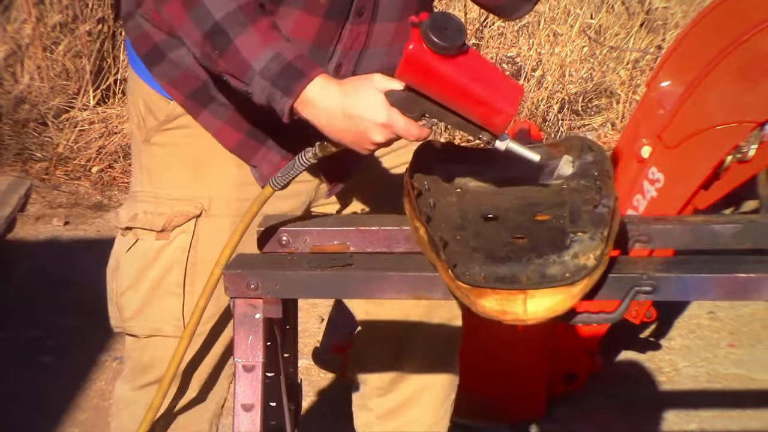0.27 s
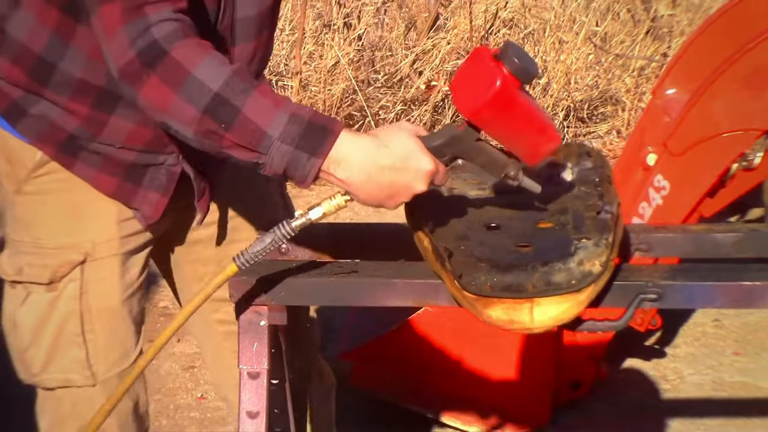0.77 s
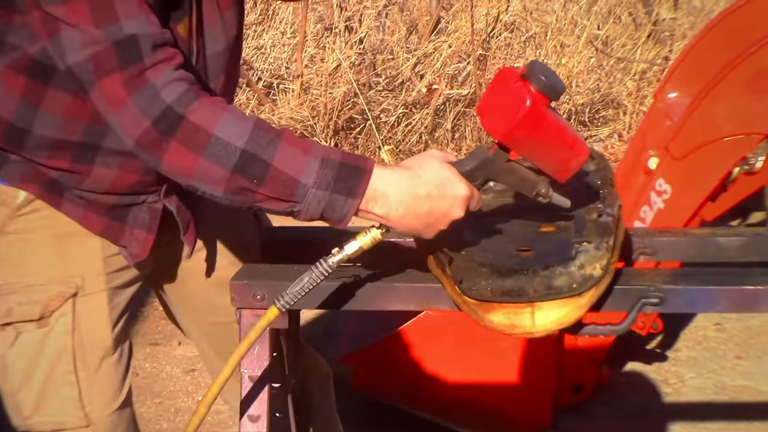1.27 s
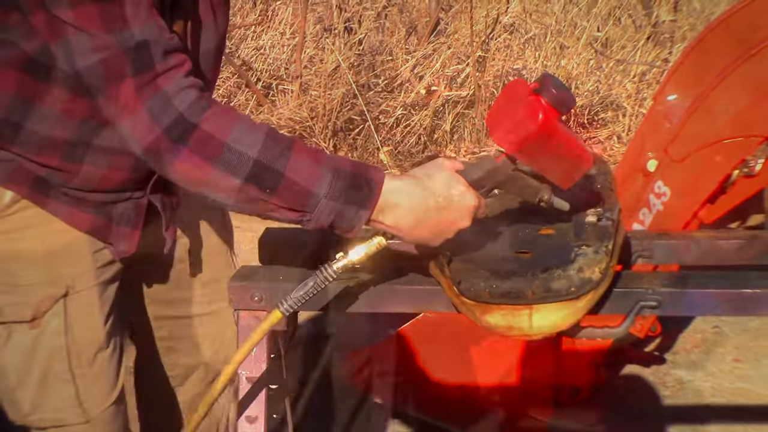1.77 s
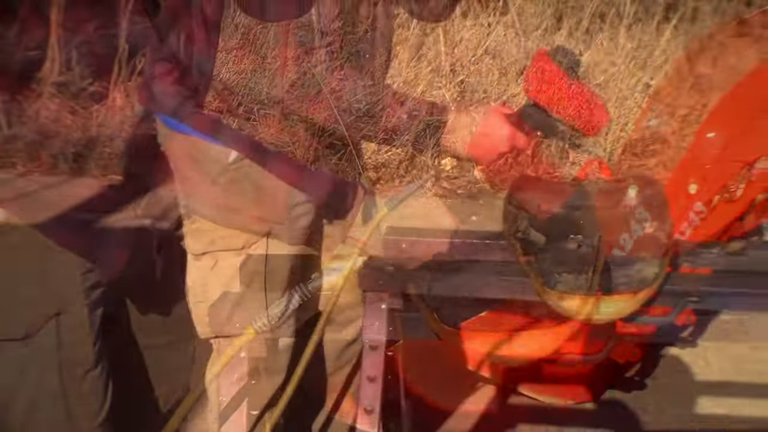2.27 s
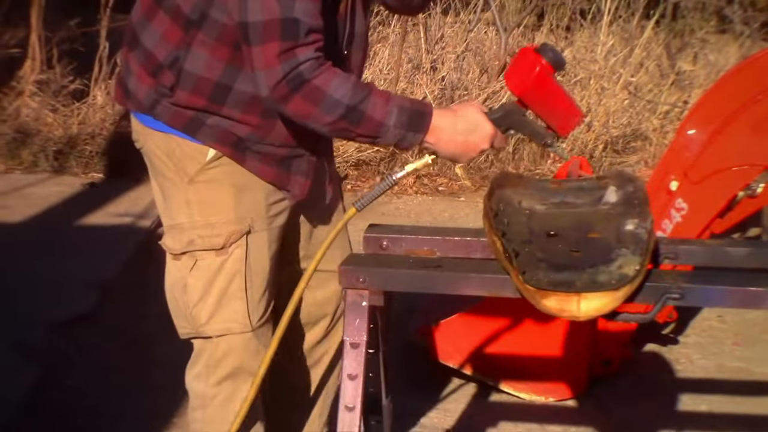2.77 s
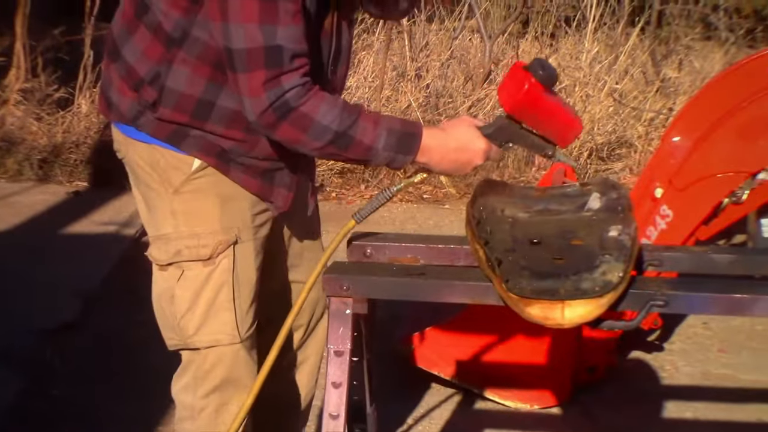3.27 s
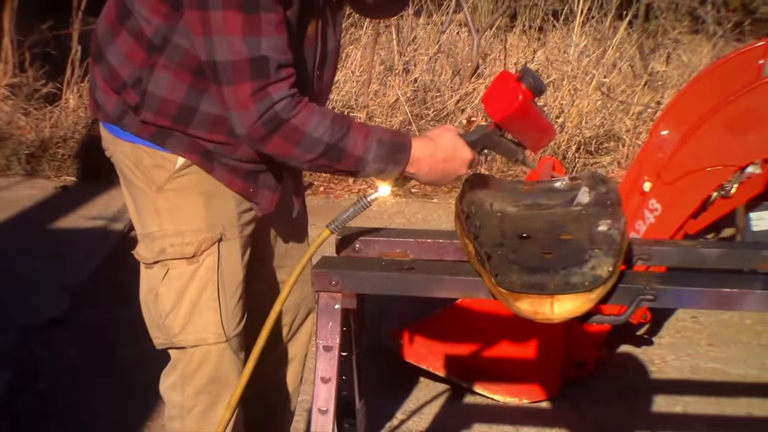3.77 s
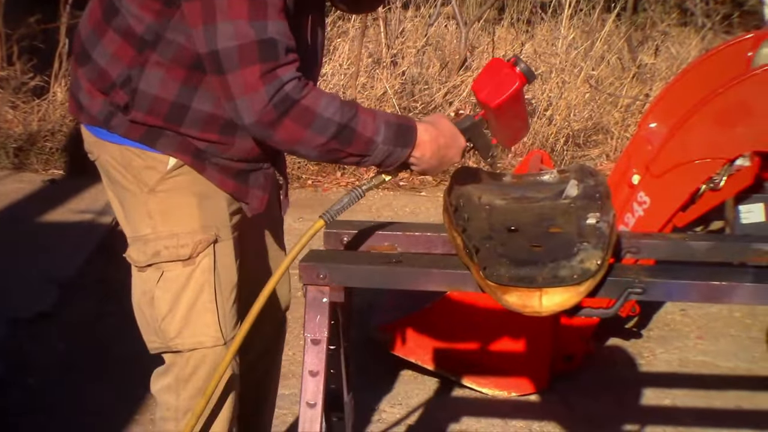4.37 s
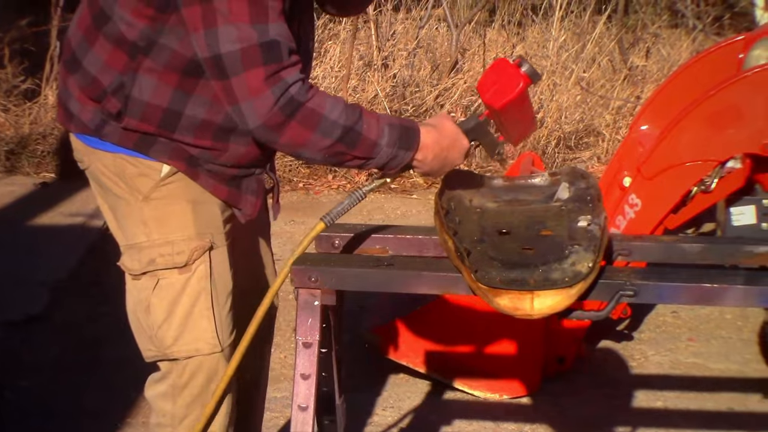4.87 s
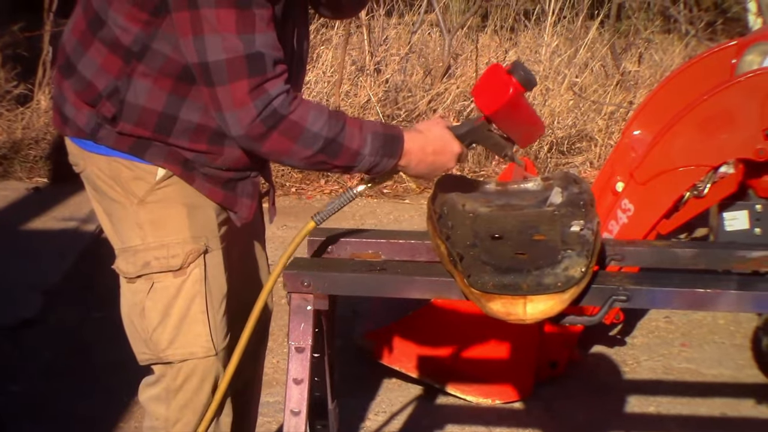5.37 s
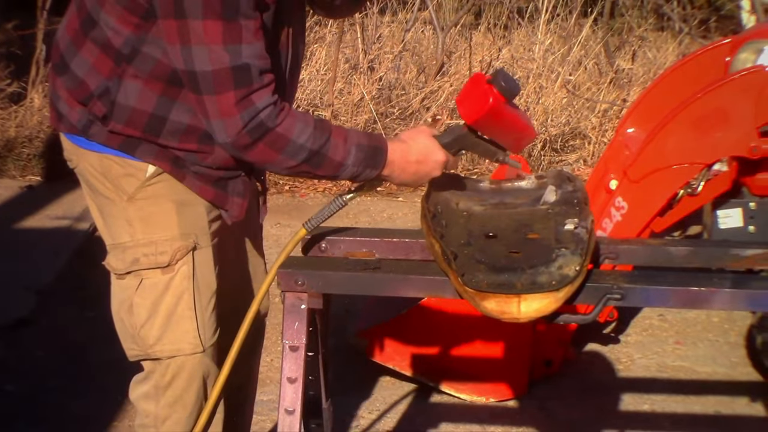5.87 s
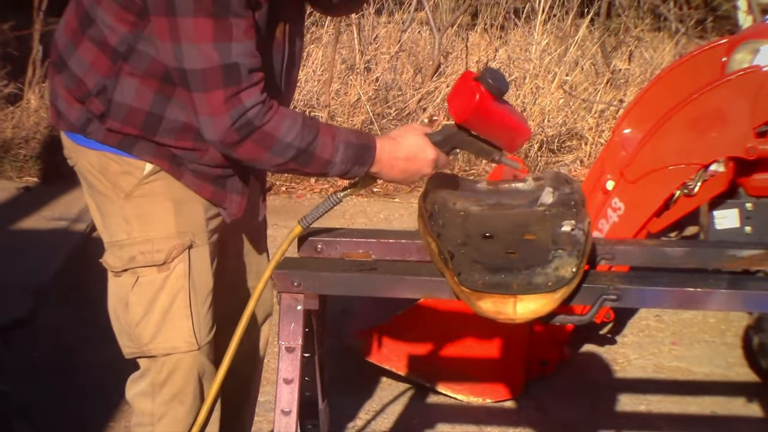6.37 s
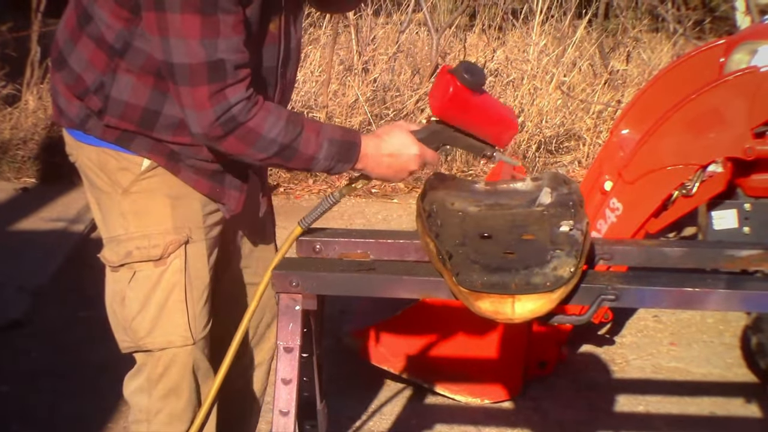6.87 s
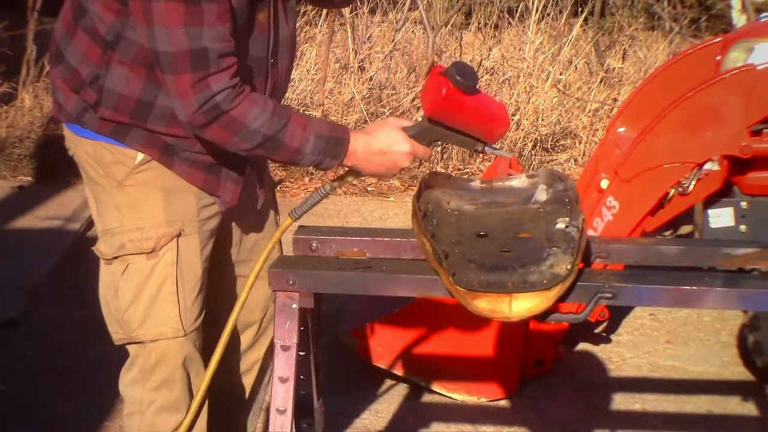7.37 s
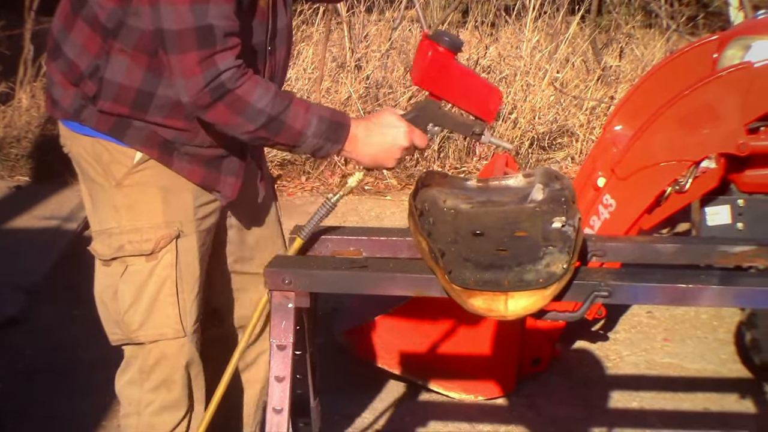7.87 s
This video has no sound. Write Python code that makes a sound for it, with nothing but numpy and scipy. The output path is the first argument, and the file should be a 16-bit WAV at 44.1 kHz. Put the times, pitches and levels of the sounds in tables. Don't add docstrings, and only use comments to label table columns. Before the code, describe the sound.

A fast, low piston-compressor throb, about nineteen thuds a second, runs throughout with a faint motor and open-air wash. At 0.15 s a handheld grit blaster gives a harsh, sandy hiss lasting 0.15 s. Tiny touches follow near 0.5 s, then hard dry clacks and rattling of the gun on steel from 0.65 to 0.9 s. Blasts return at 1.05 and 1.37 s, a sharp knock at 1.73 s, and another blast at 1.85 s. Sound sinks from about 2.0 s and returns abruptly at 2.13 s. Bursts then come at 2.3, 2.7, 3.1, 3.4, 4.1, 4.5, 5.05, 5.55, 5.9, 6.25, 6.75, 7.1, 7.5 and 7.85 s, each about 0.15-0.25 s, with light taps near 4.4 and 4.8 s. Starts are crisp, tails short with yard reflections; the background ducks under every burst. Close, nearly central outdoor microphone.

```python
import sys
import numpy as np
from scipy import signal
from scipy.fft import rfft, irfft, next_fast_len
from scipy.io import wavfile
from scipy.ndimage import uniform_filter1d

SR = 44100
rng = np.random.default_rng(int(sys.argv[2]) if len(sys.argv) > 2 else 0)


def voltage_ratio(decibels):
    exponent = np.asarray(decibels, float) / 20
    return 10 ** exponent


def inscribe(sig):
    pcm = np.round(np.clip(np.atleast_2d(sig).T, -1, 1) * 32767)
    wavfile.write(sys.argv[1], SR, pcm.astype(np.int16))


N = 357689
T = np.arange(N) / SR
SIZE = next_fast_len(N)
HZ = np.maximum(np.arange(SIZE // 2 + 1) * SR / SIZE, 1)

# (valve opens [s], shuts [s], hose pressure [dB], its sag by the end [dB], aim into bowl [dB])
PULLS = [(0.149, 0.29, 2.5, 3, 4), (1.055, 1.203, 1.1, 1.5, 3.6), (1.374, 1.509, 4, 5, 3),
         (1.854, 1.994, 3.5, 3.5, 1.5), (2.28, 2.465, 0.2, 2, -1.3), (2.676, 2.885, -0.26, -0.9, -1.5),
         (3.085, 3.235, 1.5, 1.6, -0.1), (3.418, 3.563, 0.2, -0.4, -1.1), (4.105, 4.297, 1.15, 0.6, -1.5),
         (4.503, 4.709, 1.35, 0.8, -2), (5.054, 5.245, 1.75, 4, -0.2), (5.542, 5.714, 1.65, 4, -1),
         (5.903, 6.079, 1.7, 4.3, -1.1), (6.246, 6.394, 1.9, 0.7, 0.5), (6.752, 6.947, 2.1, 3.3, -1.1),
         (7.128, 7.297, 0.45, 1.8, 2.5), (7.466, 7.715, 1, 3, -2.5), (7.843, 7.998, 0.3, 2, 0.9)]
# (start [dB], one third [dB], two thirds [dB], end [dB])
AIM = [(-3.5, 2, 3, 2), (-2.4, 2.5, 2.5, 1.5), (-1, -2, 1.2, 4.5), (3, -3.5, -1.2, 0.8), (-1.5, 5, 1, 1.5),
       (0.5, 3.7, 1.6, -0.2), (2.2, -0.5, -1.5, -3), (1.6, 2.3, -0.2, -2), (-3.5, 1.5, -2.5, -5),
       (-5.5, -3.5, -1.5, -7), (-8.0, 1.5, 3, 1.6), (1.5, 0.9, 1, -0.2), (-2.5, 1.3, 6, 2.4),
       (-3.5, -2.5, 0, -3.6), (-2.1, -4, -4, 1.5), (4.7, -0.7, -2.3, -0.5), (3.3, -1.5, 2.5, 2.2),
       (2, 3, -8, -11.1)]
LEAKS_S = [.013, .012, .012, .01, .013, .012, .012, .014, .01, .017, .009, .008, .01, .011, .011, .008,
           .007, .008]
# (low edge [Hz], high edge [Hz])
BAND_EDGES = [
    (1500, 4000),
    (200, 1500),
    (4000, 9000),
    (9000, 20000),
]
# (usual level [dB], first rush of bare air [dB], share of the aim [1], share of the bowl [1])
BANDS = [(-15, -0.34, 0.86, -0.29), (-22, -2.3, 0.89, 1), (-17, 2.5, 0.07, -0.54), (-26, 5.5, -0.29, 0.23)]
# (hose empties [dB/s], near echoes [dB], they die [dB/s])
FADE = [(635, -9, 285), (537, -3.5, 265), (690, -12, 316), (750, -5.5, 390)]
LEAK_DB = [-25.5, -19, -20, -22]
# (time [s], extra level
# in the top band [dB], lasts [s])
SPITS = [
    (2.455, 7, 0.01),
    (5.235, 9.5, .012),
    (7.995, 3, .012),
    (7.725, -10, 0.027),
    (6.3, 1.5, .06),
]
SPIT_SHARE = [0, 0.039, 0.42, 1]
# (frequency [Hz], level per Hz [dB])
JET = [(180, -55), (300, -26), (770, -4), (1020, -4), (1070, -9), (1260, 0.5), (1820, -6.5), (2110, -4.5),
       (3140, -6), (4090, -4.5), (5150, 0), (7410, -3), (8190, -2), (9980, -12.5), (15600, -25)]
# (frequency [Hz], side against mid [dB])
WIDTH = [(60, -34), (180, -5), (550, -33), (1650, -23), (4970, -16), (15000, -20)]
# (frequency [Hz], width [Hz], depth [dB])
DIPS_FIRST = [(1004, 610, 6.5), (1760, 470, 5.5), (2550, 240, 5), (4170, 710, 4), (4800, 170, 0),
              (6400, 250, -1.5), (7650, 140, 4), (9740, 240, 5.5)]
DIPS_SECOND = [(1080, 184, 4.8), (1455, 187, 6.4), (1872, 192, 5), (2395, 187, 4.8), (3380, 64, 6.7),
               (4115, 250, 5.9), (4710, 107, 9), (5570, 83, 2.8), (6196, 107, 7.8), (7010, 130, 4.4),
               (7680, 190, 7.2), (9450, 310, 5.8)]
# (delay [s], gain [1])
ECHOES_FIRST = [(.0021, 0.17), (.0047, -0.093), (.0083, 0.22), (.0139, 0.16)]
ECHOES_SECOND = [(.0024, 0.13), (.0053, 0.045), (.0091, 0.25), (.0127, 0.23)]
# (time [s], peak level [dB], rattle t60 [s], centre [Hz], ringing [Hz])
KNOCKS = [(.659, -11, .15, 2600, 1750), (.752, -14, .1, 3800, 5600), (.78, -30, .15, 900, 800),
          (.845, -33, .03, 1900, 1850), (.86, -32, .03, 2500, 1850), (.882, -31, .03, 1900, 1850),
          (.493, -40, .04, 4000, 3100), (.521, -40, .04, 1800, 1700), (1.733, -14, .07, 1600, 4750),
          (1.77, -34, .12, 3000, 3050), (4.429, -25.5, .04, 3600, 2700), (4.84, -35, .03, 4500, 4200)]
# (frequency [Hz], level [dB], t60 [s])
STEEL = [(870, 4, 0.008), (1240, 6, 0.0019), (2450, 1, 0.0038), (3300, 11.5, 0.0019), (4820, 2, 0.0013),
         (5830, -11, 0.006), (7100, 2.5, 0.0027)]
# (frequency [Hz], level [dB], t60 [s])
PUMP = [(79, -67, 0.049), (120.5, -41, 0.84), (168.8, -38.5, 0.25), (226, -28.5, 0.12),
        (308.7, -24.5, 0.051), (343.5, -43, 0.06), (384, -39, 0.95), (434, -54, 0.34), (500.3, -42, 0.46),
        (560, -45.5, 0.17), (673, -81, .2)]
# (frequency [Hz], level per Hz [dB])
YARD = [(25, -27), (40, -27), (58, -38), (75, -28), (150, -11), (250, -12), (400, -8.5), (550, -16.5),
        (750, -21), (1900, -23.5), (4000, -30.5), (7000, -29), (8500, -30), (11000, -34), (15700, -44.5)]
# (time [s], level [dB])
SCENE_FADE = [
    (1.9, 0.5),
    (2.02, -2.5),
    (2.07, -7.5),
    (2.1, -11),
    (2.134, -17),
    (2.1345, 0.5),
]

SCENE_CHANGE_S = 2.134
PUMP_HZ, STROKES_FROM_S = (19.107, 19.113), (.0243, 2.1208)
YARD_DB = -47.5
RUSH_S = 0.043
DUCK_DB, DUCK_GRAB_S, DUCK_LET_GO_S = 3, 0.09, 0.004
RISE_SHARE, KNOCK_TOP_HZ = 0.056, 9000


def blaster(grit, patchy_db):
    sizes = voltage_ratio(3.0 * np.minimum(rng.exponential(1, N), 4)) * rng.choice([-1, 1], N)
    strikes = rng.random(N) < 5000 / SR
    mid = rng.standard_normal(N) + grit * rms_one(sizes * strikes)
    side = rng.standard_normal(N)
    jet_db, width_db = at_hz(JET, HZ), at_hz(WIDTH, HZ)
    first = colour(mid, side, jet_db + surroundings(DIPS_FIRST, ECHOES_FIRST), width_db)
    second = colour(mid, side, jet_db + surroundings(DIPS_SECOND, ECHOES_SECOND), width_db)
    jet = patches(np.where(T < SCENE_CHANGE_S, first, second), patchy_db)
    spectrum = rfft(jet, SIZE)
    out = 0
    for band, (low, high) in enumerate(BAND_EDGES):
        hiss = irfft(spectrum * (above(low) - above(high)), SIZE)[:, :N]
        out = out + rms_one(hiss) * valve(band, rise_s=0.014)
    return out * voltage_ratio(pulled_down() + 0.65 * drift(46))


def valve(band, rise_s):
    power = np.zeros(N)
    empty, echo_db, dies = FADE[band]
    for pull, (opens, shuts, *_) in enumerate(PULLS):
        leak = opens - LEAKS_S[pull]
        span = slice(int(leak * SR), int((shuts + .5) * SR))
        t = T[span]
        level_db = flow_db(band, pull, t)
        leaking = voltage_ratio(2 * LEAK_DB[band]) * np.clip((t - leak) / 0.0044, 0, 1)
        opening = np.clip((t - opens + 0.0026) / rise_s, 0, 1) ** 2.4 + leaking
        since = np.maximum(t - shuts, 0)
        closing = voltage_ratio(-2 * empty * since) + voltage_ratio(2 * (echo_db - dies * since))
        closing += voltage_ratio(2 * (-29.0 - 2.0 * band - 86 * since))
        power[span] += voltage_ratio(2 * level_db) * opening * closing
    return np.sqrt(power)


def flow_db(band, pull, t):
    opens, shuts, pressure_db, sag_db, bowl_db = PULLS[pull]
    usual_db, rush_db, by_aim, by_bowl = BANDS[band]
    done = np.clip((t - opens) / (shuts - opens), 0, 1)
    aim_db = np.interp(done, np.linspace(0, 1, len(AIM[pull])), AIM[pull])
    rush = rush_db * np.exp(-np.maximum(t - opens, 0) / RUSH_S)
    spit_db = sum(db * np.exp(-((t - s) / lasts) ** 2) for s, db, lasts in SPITS)
    rush += SPIT_SHARE[band] * spit_db
    return usual_db + pressure_db - sag_db * done + rush + by_aim * aim_db + by_bowl * bowl_db


def patches(x, patchy_db):
    frames = signal.stft(x, nperseg=512)[2]
    field = rng.standard_normal(frames.shape[1:])
    field = uniform_filter1d(field, size=3, axis=0)
    field = uniform_filter1d(field, size=5, axis=1)
    return signal.istft(frames * voltage_ratio(patchy_db * rms_one(field)), nperseg=512)[1][:, :N]


def surroundings(dips, echoes):
    ripple = 1 + sum(gain * np.exp(-2j * np.pi * HZ * delay) for delay, gain in echoes)
    dip_db = sum(depth_db * np.exp(-((HZ - hz) / width) ** 2) for hz, width, depth_db in dips)
    return 20 * np.log10(np.abs(ripple) + 1e-3) - dip_db


def knocks():
    out, t = np.zeros(N), T[:SR // 4]
    for s, peak_db, t60, centre_hz, ring_hz in KNOCKS:
        rise = RISE_SHARE * t60
        decay = voltage_ratio(-60 * np.maximum(t - rise, 0) / t60)
        echo = voltage_ratio(-10.5 - 130 * t)
        shape = np.clip(t / rise, 0, 1) ** 2 * (decay + echo)
        grains = 1 + 0.73 * (rng.random(len(t)) < .02)
        rattle = shape * rng.standard_normal(len(t)) * grains
        rung = sum(voltage_ratio(db) * ring(rattle, hz, d) for hz, db, d in STEEL)
        hit = rms_one(rung) + 1.2 * rms_one(rattle)
        edges = [centre_hz / 2.03, centre_hz * 1.9]
        hit = signal.sosfilt(signal.butter(1, edges, "band", fs=SR, output="sos"), hit)
        hit = signal.sosfilt(signal.butter(1, KNOCK_TOP_HZ, fs=SR, output="sos"), hit)
        ring_share = .2 if peak_db > -29 else .8
        hit = rms_one(hit) + ring_share * rms_one(ring(rattle * (t < .02), ring_hz, .07))
        out[int(s * SR):][:len(t)] += voltage_ratio(peak_db) * hit / np.abs(hit).max()
    return out


def compressor(jitter_s, puff, valve_s, valve_gain):
    first, second = (start + np.arange(-1, 160) / hz for start, hz in zip(STROKES_FROM_S, PUMP_HZ))
    first, second = first[1:], second[1:]
    at = np.concatenate([first[first < 2.1], second[second < N / SR - .001]])
    chance = rng.standard_normal((len(at), 2))
    clicks = np.zeros(N)
    where = ((at + jitter_s * chance[:, 0]) * SR).astype(int).clip(0, N - 1)
    clicks[where] = -voltage_ratio(0.7 * chance[:, 1])
    drive = clicks + valve_gain * np.roll(clicks, int(valve_s * SR))
    drive = drive + puff * rng.standard_normal(N) / np.sqrt(SR / PUMP_HZ[0])
    thud = sum(voltage_ratio(db) * ring(drive, hz, t60) for hz, db, t60 in PUMP)
    thud += voltage_ratio(-32) * ring(np.roll(clicks, int(0.044 * SR)), 340, 0.029)
    thud = signal.sosfilt(signal.butter(8, 73, "high", fs=SR, output="sos"), thud)
    return signal.sosfilt(signal.butter(3, 560, fs=SR, output="sos"), thud)


def yard():
    shape_db = at_hz(YARD, HZ) + .5 * surroundings(DIPS_SECOND, []) * (HZ > 800)
    scale = np.sqrt(np.mean(voltage_ratio(2 * shape_db) * (HZ > 800)))
    wash = colour(*rng.standard_normal((2, N)), shape_db, -15 + 1.0 * above(730))
    return voltage_ratio(YARD_DB + 0.21 * drift(4.4)) * patches(wash, 1.0) / scale


def pulled_down():
    out = np.zeros(N)
    for pull, (opens, shuts, *_) in enumerate(PULLS):
        span = slice(int(opens * SR), int((shuts + .2) * SR))
        t = T[span]
        hold = np.clip((t - opens) / DUCK_GRAB_S, 0, 1) * np.exp(-np.maximum(t - shuts, 0) / DUCK_LET_GO_S)
        out[span] += hold * np.maximum(DUCK_DB + flow_db(0, pull, t) - BANDS[0][0], 0)
    return out


def ring(x, hz, t60):
    r, w = voltage_ratio(-60 / (t60 * SR)), 2 * np.pi * hz / SR
    return signal.lfilter([0, np.sin(w)], [1, -2 * r * np.cos(w), r * r], x + 1e-18)


def colour(mid, side, gain_db, side_db):
    m = irfft(rfft(mid, SIZE) * voltage_ratio(gain_db), SIZE)[:N]
    s = irfft(rfft(side, SIZE) * voltage_ratio(gain_db + side_db), SIZE)[:N]
    return np.array([m + s, m - s])


def drift(rate):
    r = np.exp(-80 * np.pi * rate / SR)
    slow = signal.lfilter([1], [1, -2 * r, r * r], rng.standard_normal(N // 40 + 1002))[1000:]
    return np.interp(np.arange(N) / 40, np.arange(len(slow)), rms_one(slow))


def above(hz):
    return np.clip(.5 + 2 * np.log2(HZ / hz), 0, 1)


def at_hz(points, hz):
    table_hz, table_db = np.array(points)[:, 0], np.array(points)[:, 1]
    return np.interp(np.log(hz), np.log(table_hz), table_db)


def rms_one(x):
    return x / np.sqrt(np.mean(x ** 2) + 1e-20)


def scene():
    balance = voltage_ratio([[.15], [-.15]])
    pump = compressor(jitter_s=.0001, puff=.05, valve_s=.0037, valve_gain=1.0) * balance
    return blaster(grit=0.48, patchy_db=2.5) + knocks() + pump + yard()


def band_limit(x):
    return signal.sosfilt(signal.butter(12, 16650, fs=SR, output="sos"), x)


def record(dry):
    x = dry * voltage_ratio(np.interp(T, *np.transpose(SCENE_FADE)) - pulled_down())
    x = 1.073 * np.tanh(x / 1.156)
    x = signal.sosfilt(signal.ellip(10, .3, 70, 15720, fs=SR, output="sos"), x)
    x = signal.sosfilt(signal.butter(1, 45, "high", fs=SR, output="sos"), x)
    return band_limit(np.clip(x, -1, 1))


dry = scene()
out = record(dry)
inscribe(out)
```